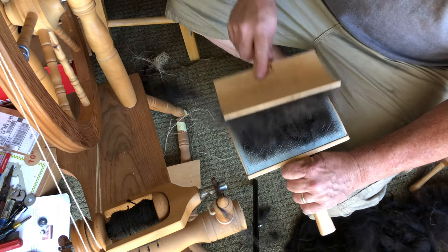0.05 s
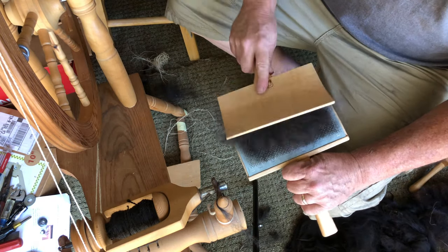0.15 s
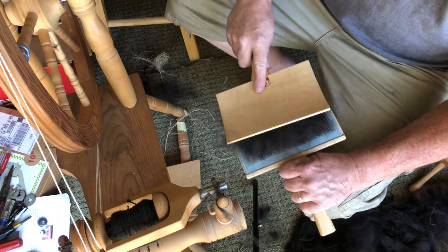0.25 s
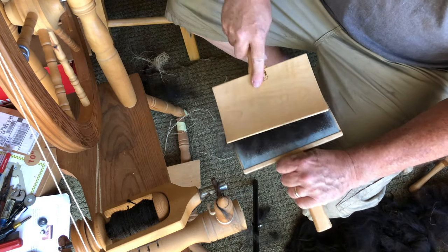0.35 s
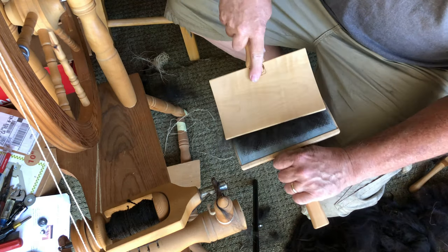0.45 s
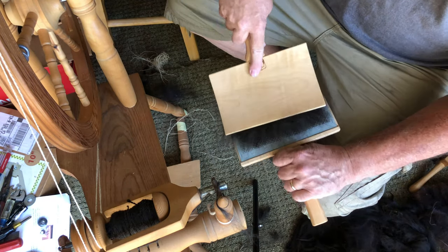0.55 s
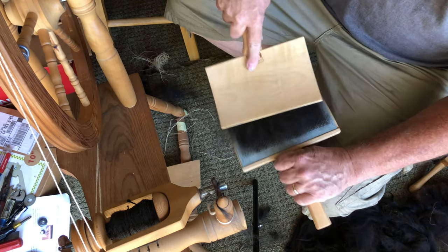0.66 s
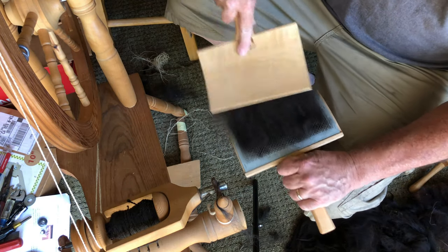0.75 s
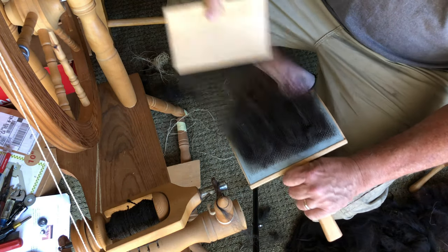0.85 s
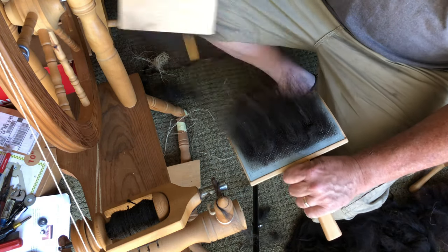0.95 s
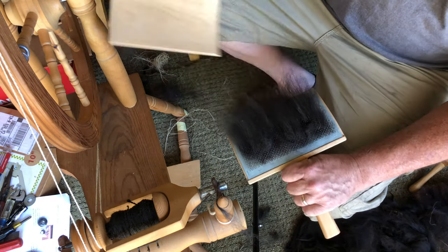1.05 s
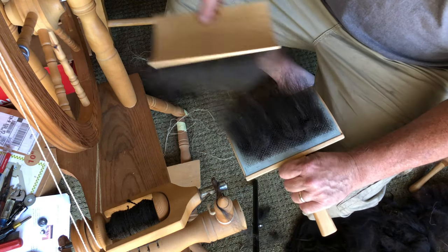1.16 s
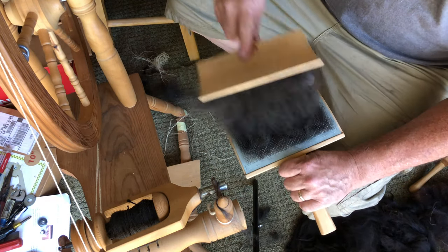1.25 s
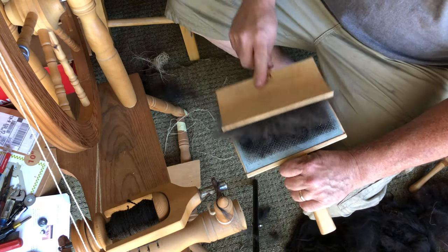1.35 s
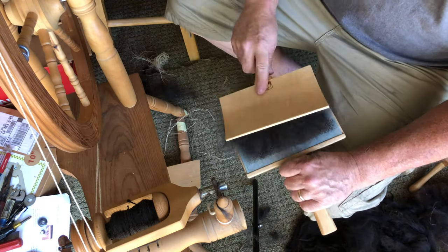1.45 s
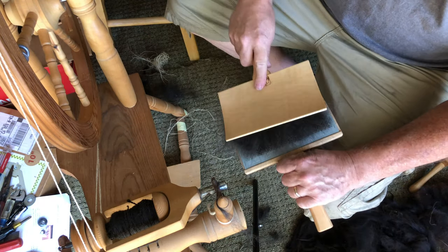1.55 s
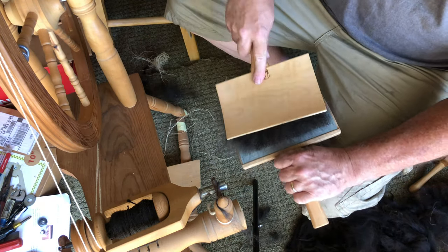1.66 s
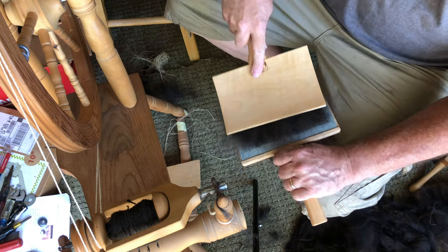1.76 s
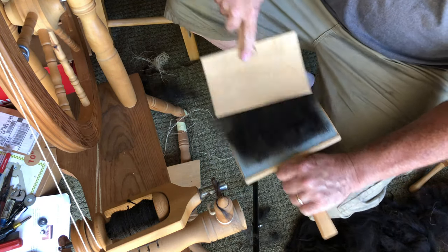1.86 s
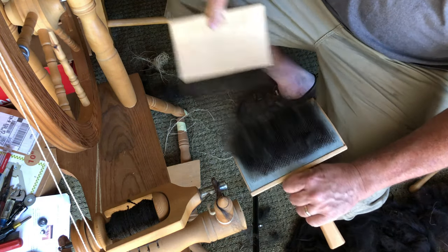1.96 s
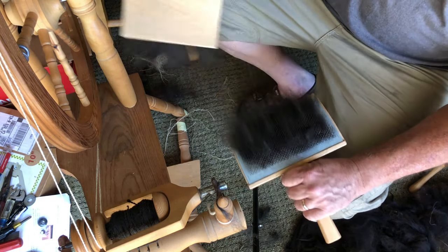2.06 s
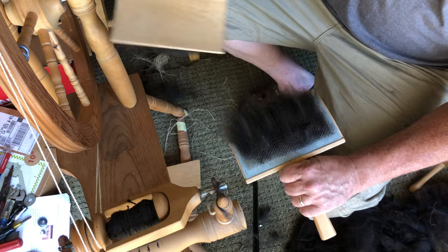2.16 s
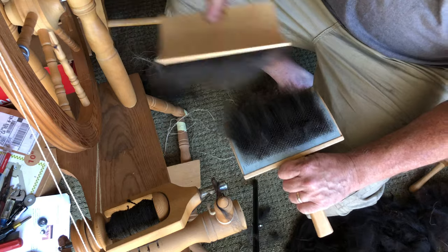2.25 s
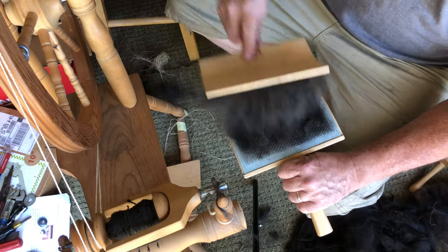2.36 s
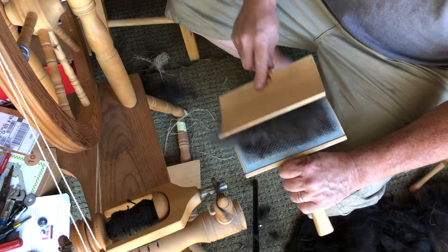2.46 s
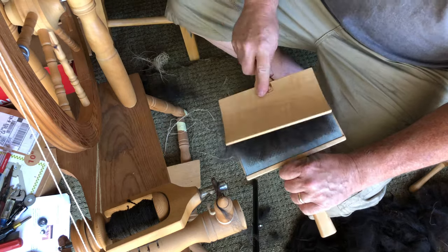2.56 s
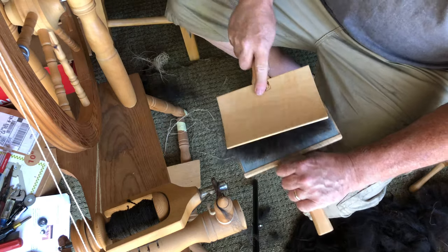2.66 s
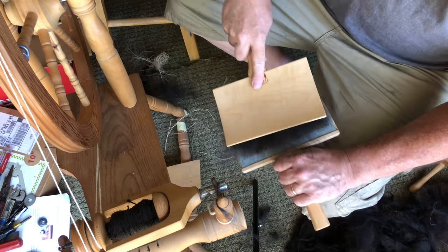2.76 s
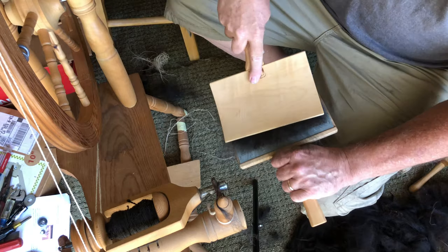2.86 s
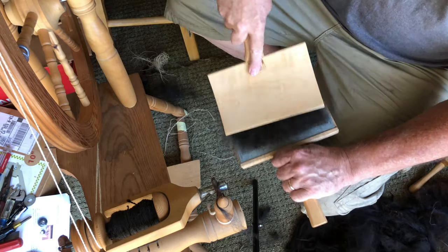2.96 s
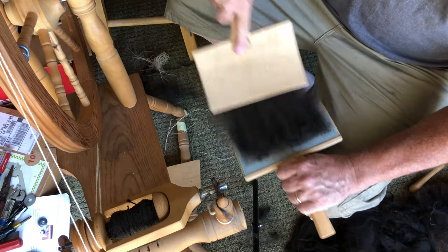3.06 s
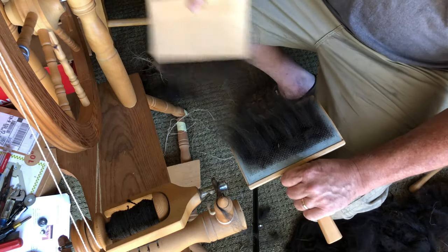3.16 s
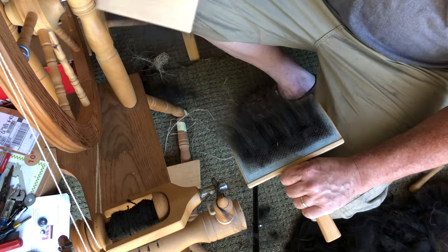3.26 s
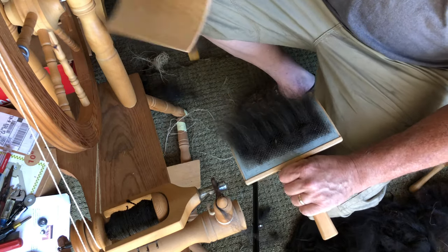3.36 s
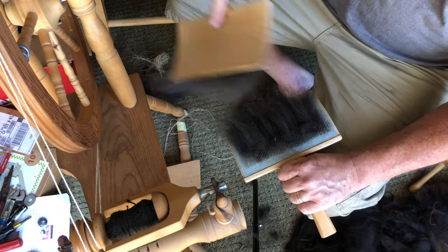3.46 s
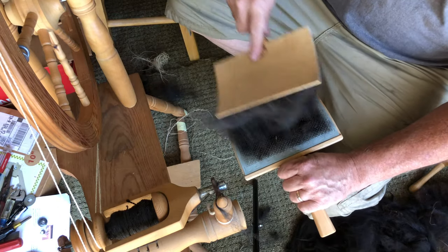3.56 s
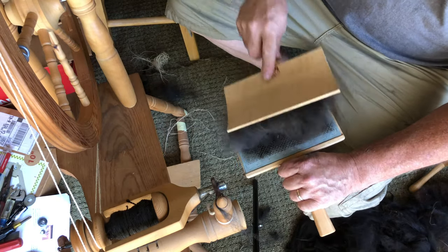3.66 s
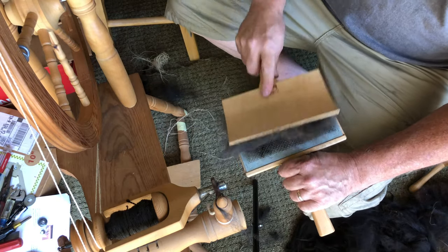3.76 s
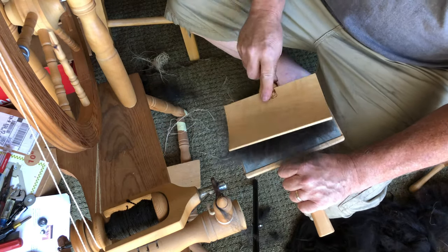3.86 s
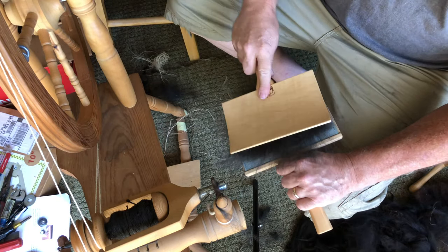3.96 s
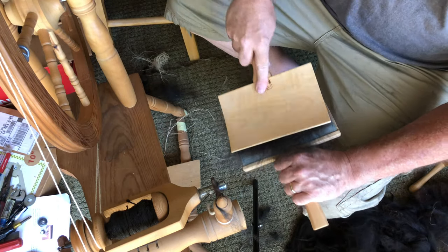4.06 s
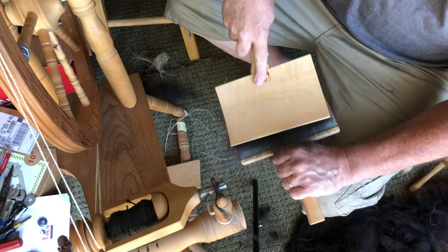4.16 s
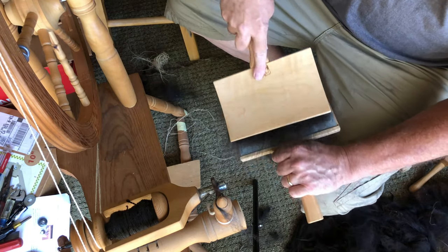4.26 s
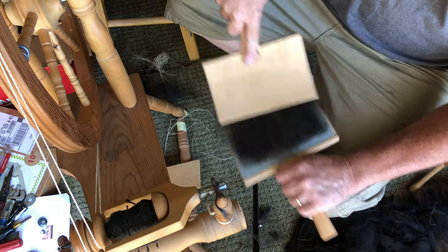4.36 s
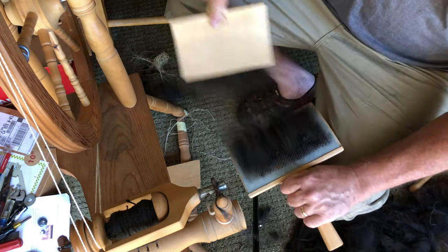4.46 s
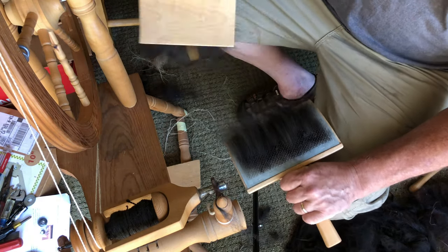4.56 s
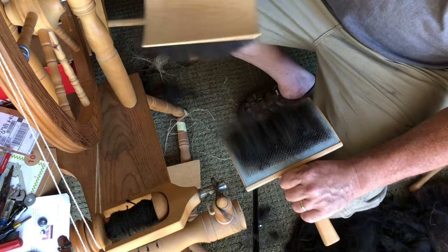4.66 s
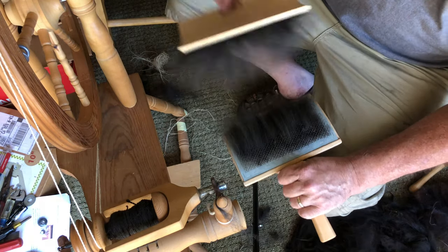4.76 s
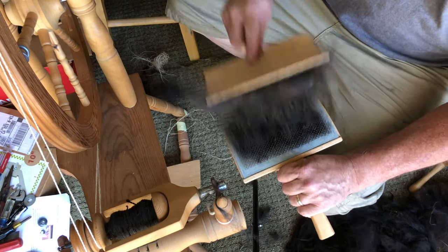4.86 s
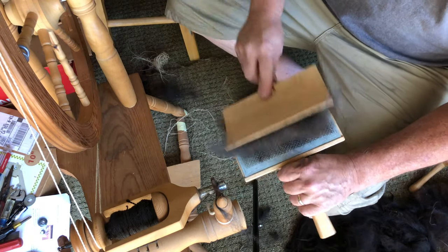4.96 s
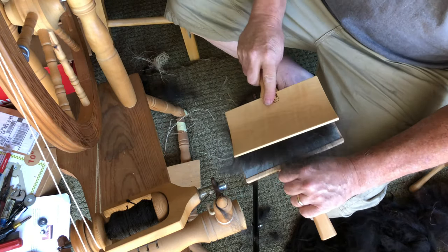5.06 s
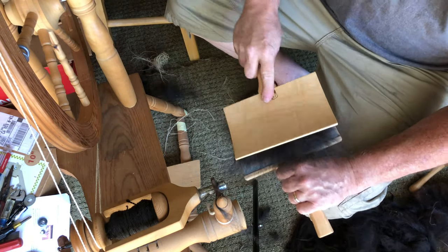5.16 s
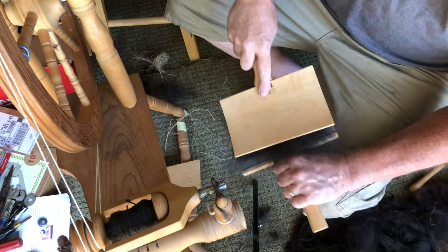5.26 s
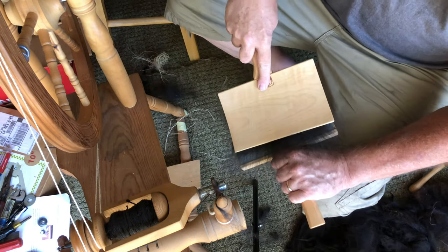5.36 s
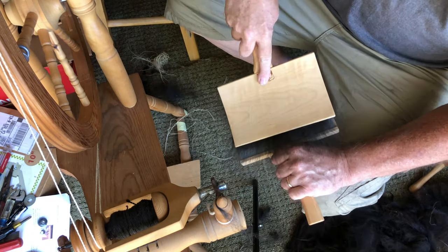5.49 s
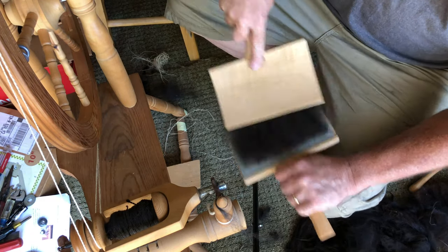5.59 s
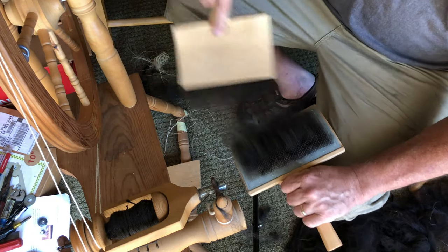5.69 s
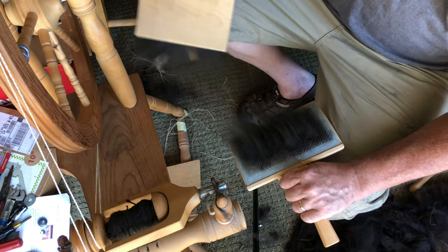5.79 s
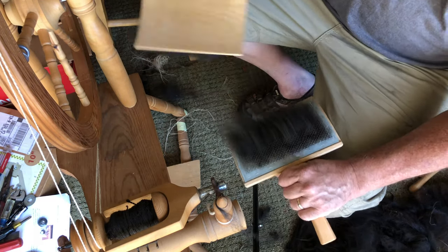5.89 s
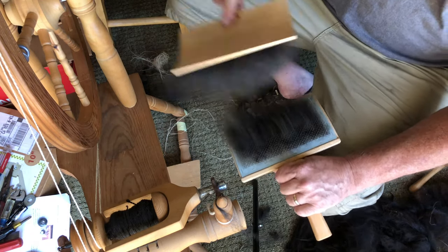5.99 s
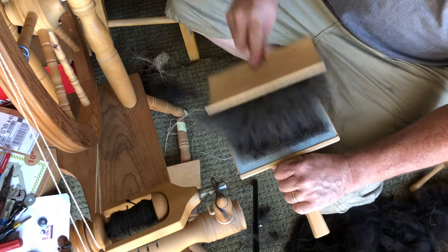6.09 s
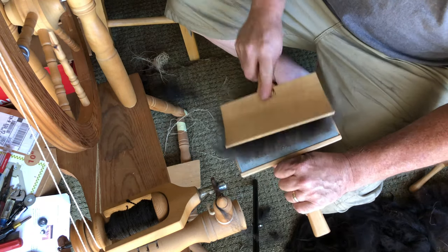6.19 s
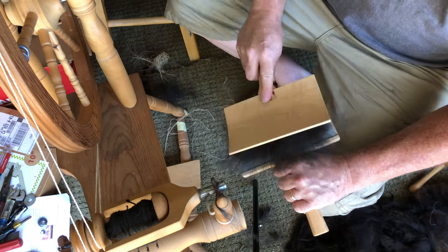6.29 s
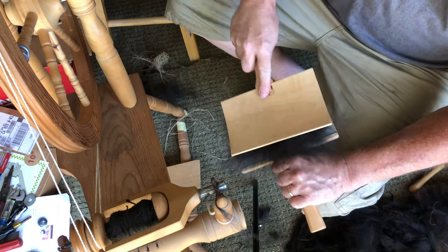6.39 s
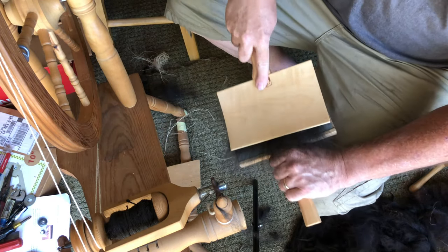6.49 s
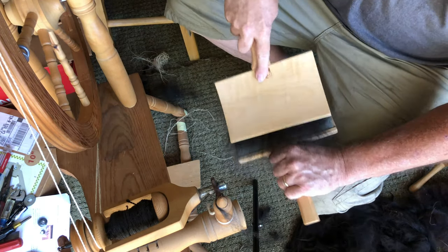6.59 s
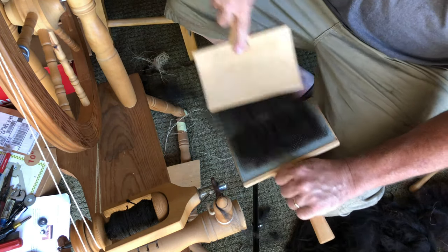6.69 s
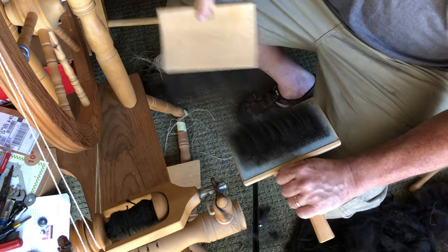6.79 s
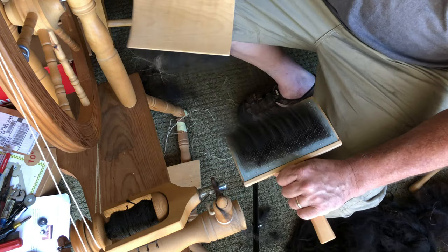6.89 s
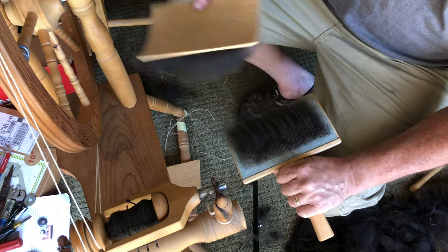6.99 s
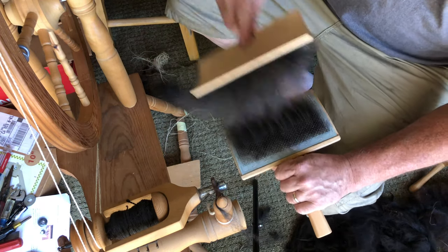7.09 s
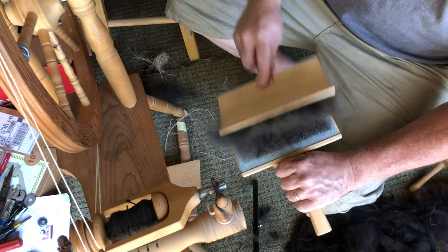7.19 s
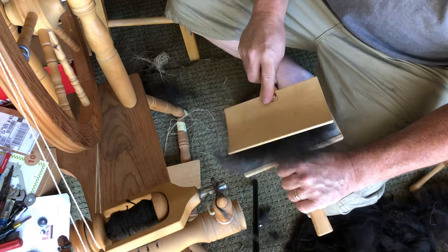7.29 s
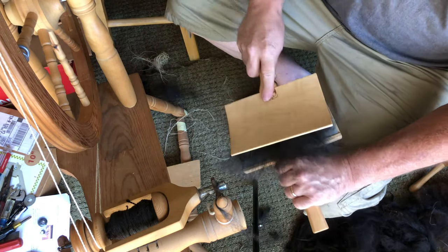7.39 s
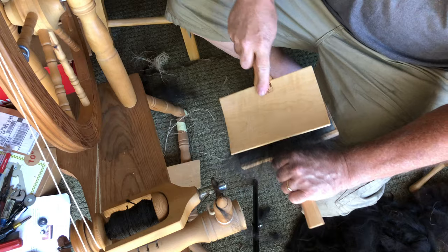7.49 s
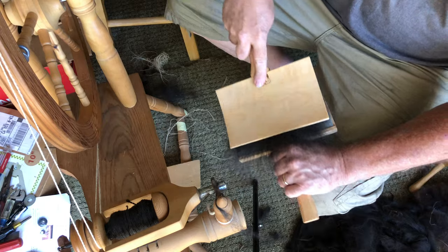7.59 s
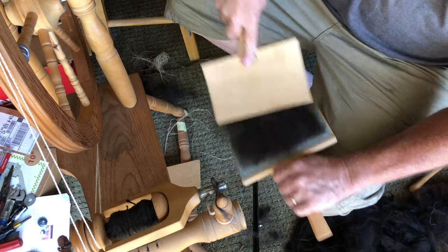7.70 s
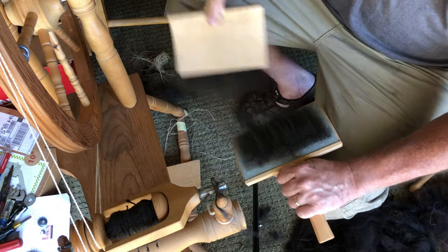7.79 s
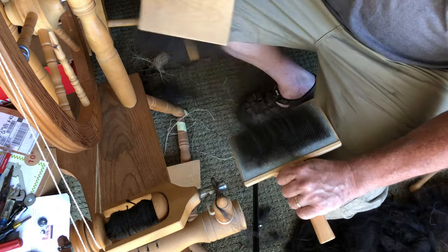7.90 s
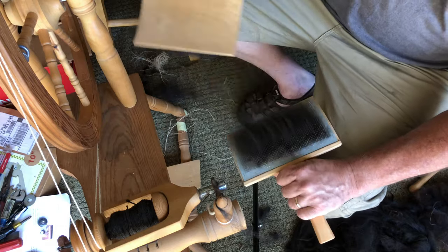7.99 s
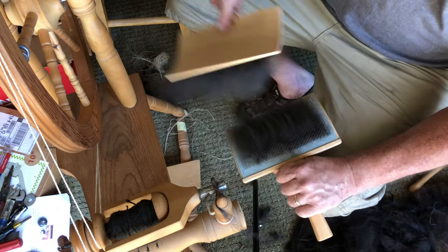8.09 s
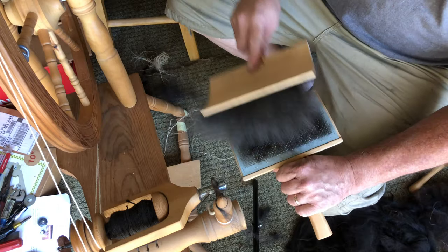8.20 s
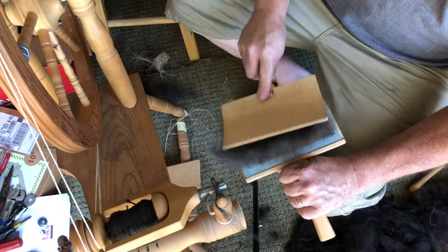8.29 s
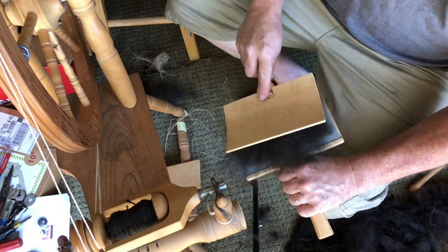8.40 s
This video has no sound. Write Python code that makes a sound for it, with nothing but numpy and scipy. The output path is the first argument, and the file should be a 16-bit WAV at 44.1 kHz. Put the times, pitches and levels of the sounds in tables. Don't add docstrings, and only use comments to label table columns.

```python
import sys
import numpy as np
from scipy import signal
from scipy.fft import rfft, irfft, next_fast_len
from scipy.io import wavfile
from scipy.ndimage import uniform_filter1d

SR = 44100
rng = np.random.default_rng(int(sys.argv[2]) if len(sys.argv) > 2 else 0)


def ratio_of_db(decibels):
    return 10 ** (np.asarray(decibels, float) / 20)


def inscribe(sig):
    pcm = np.round(np.clip(np.atleast_2d(sig).T, -1, 1) * 32767)
    wavfile.write(sys.argv[1], SR, pcm.astype(np.int16))


N = 372204
KNOCK_S = 3.3745

PART_ANSWERS = {"paddle": (0.16, 0, 0.5, 1.01, 153.5, 4), "shanks": (-13, 3.5, -8, 1.22, 90.5, 8),
                "flex": (-10.5, -4, -7.5, 1.22, 150.5, 4), "tips": (-14.5, 7.5, -6, 1.26, 69.5, 15)}


def evened(x):
    return x / np.sqrt(np.mean(x ** 2) + 1e-20)


def read(points, hz):
    f, value = np.transpose(points)
    return np.interp(np.log(hz + 1), np.log(f + 1), value)


def add(mix, s, sound):
    part = mix[round(s * SR):][:len(sound)]
    part += sound[:len(part)]


def coloured(x, spectrum):
    gain_db = np.maximum(read(spectrum, abs(np.fft.fftfreq(4096, 1 / SR))), -70)
    log_gain = np.log(ratio_of_db(gain_db))
    phase = -signal.hilbert(log_gain).imag
    taps = np.fft.ifft(np.exp(log_gain + 1j * phase)).real[:2048]
    return signal.oaconvolve(x, taps / np.linalg.norm(taps))[:len(x)]


def resonate(x, hz, width_hz):
    r = np.exp(-np.pi * width_hz / SR)
    return 2 * signal.lfilter([1 - r], [1, -r * np.exp(2j * np.pi * hz / SR)], x).real


def cards():
    # Hz, dB per Hz.
    paddle_colour = [(350, -37.5), (600, -7), (669, -11), (721, -5.5), (1050, 0.5), (1850, -4.5),
                     (2220, -4), (2410, -6), (3180, -7), (3690, -16), (4400, -13), (5720, -35.5),
                     (9680, -120)]
    # Hz, dB per Hz.
    shank_colour = [(2240, -34), (3800, -3.5), (5380, 5.5), (7070, -3.5), (8400, -18), (10900, -32),
                    (18500, -120)]
    # Hz, dB per Hz.
    tip_colour = [(4710, -34.5), (8000, -3.5), (9600, 1.5), (10600, -1), (15100, -11), (16000, -13.5)]
    shared = slips(4000, spread_db=2.0, clump_db=3.0, clump_s=0.0039)
    fine = slips(14000, spread_db=3.5, clump_db=1.0, clump_s=0.0017)
    pull = {part: ratio_of_db(-1.0) * effort(part) for part in PART_ANSWERS}
    brushing = rustle_gain() * fine

    paddle = pull["paddle"] * regripped(evened(shared + 0.89 * fine), patchy_db=2.5)
    shanks = pull["shanks"] * regripped(evened(0.64 * shared + fine), patchy_db=3.5)
    shanks += ratio_of_db(-10.0) * brushing
    tips = pull["tips"] * regripped(evened(0.79 * shared + fine), patchy_db=1.6)
    tips += ratio_of_db(-3.5) * brushing
    bending = pull["flex"] * evened(resonate(resonate(shared + fine, 430, 270), 293, 350))

    passing = abs(slips(70, spread_db=0.5, clump_db=1.5, clump_s=.05))
    ticks = signal.lfilter([1], [1, -.985], passing) * fine

    crunch_paddle, crunch_wires = crunches()
    snag_paddle, snag_wires, rings = snags()
    struck = ratio_of_db(-12.5) * pull["shanks"] * evened(ticks) + crunch_wires + snag_wires
    wood = coloured(paddle + crunch_paddle + snag_paddle, paddle_colour)
    wires = coloured(shanks + ratio_of_db(-2.0) * struck, shank_colour)
    wires += coloured(tips + ratio_of_db(-0.85) * struck, tip_colour)
    return wood + wires + rings + bending


def slips(per_s, spread_db, clump_db, clump_s):
    clicks = (rng.random(N) < per_s / SR) * rng.standard_normal(N)
    clumps = signal.lfilter([1], [1, -np.exp(-1 / (clump_s * SR))], rng.standard_normal(N))
    size_db = spread_db * np.minimum(rng.exponential(1, N), 2.6)
    return evened(clicks * ratio_of_db(size_db + clump_db * evened(clumps)))


def effort(part):
    # teeth engaged in seconds, card lifts in seconds,
    # last fibres part in seconds, drag at the start in dB, drag at the lift in dB.
    strokes = [
        (.225, .89, .906, -55.5, -60.5),
        (1.51, 1.93, 2.04, -57, -57),
        (2.58, 3.1, 3.16, -51, -57),
        (3.89, 4.44, 4.54, -59, -56),
        (5.09, 5.7, 5.77, -49, -63),
        (6.305, 6.7, 6.78, -50, -56),
        (7.36, 7.745, 7.81, -49, -53),
        (8.395, 8.5, 8.6, -50, -52),
    ]
    # peak in seconds,
    # peak in dB, build-up in seconds, let-go in seconds (both for 10 dB).
    tears = [(.5, -53, 0.035, .08), (.724, -49.5, 0.051, 0.069), (.865, -56, 0.059, .06),
             (1.55, -56, .03, 0.035), (1.86, -49.5, 0.13, 0.048), (2.595, -48, 0.0084, 0.019),
             (2.666, -48.5, 0.011, 0.012), (3.031, -47, 0.044, 0.03), (3.94, -55, 0.022, 0.032),
             (4.005, -53.5, 0.01, 0.3), (4.2, -54, 0.21, 0.031), (4.385, -47.5, .1, 0.041),
             (5.281, -47.5, 0.057, 0.022), (5.353, -49.5, 0.083, 0.061), (5.58, -50, 0.01, 0.056),
             (5.624, -48.5, 0.081, 0.056), (6.48, -53, 0.026, 0.1), (6.547, -50, 0.07, 0.022),
             (6.683, -47, 0.064, 0.047), (7.575, -50, 0.036, 0.12), (7.70, -49, 0.014, .03),
             (7.74, -43, 0.033, 0.0097)]
    drag_db, thin_db, tear_db, steep, fade_db_per_s, drop_db = PART_ANSWERS[part]
    usual_db = -52
    engage_s, parting_db_per_s = 0.014, 900
    t = np.arange(0, N + 64, 64) / SR
    power, cut_db = 1e-14, 0
    for start, lift, parted, first_db, last_db in strokes:
        done = np.clip((t - start) / (lift - start), 0, 1)
        hand_db = first_db + (last_db - first_db) * done
        db = steep * (hand_db - usual_db) + thin_db * done - fade_db_per_s * np.maximum(t - lift, 0)
        engaged = np.clip(1 + (t - start) / engage_s, 0, 1)
        power = power + (ratio_of_db(usual_db + drag_db + db) * engaged) ** 2
        parting_db = -np.clip(parting_db_per_s * (t - parted), 0, drop_db)
        cut_db = np.where(t > start - engage_s, parting_db, cut_db)
    for s, peak_db, build, let_go in tears:
        db = peak_db - 10 * np.maximum((s - t) / build, (t - s) / let_go)
        power = power + ratio_of_db(usual_db + steep * (db - usual_db) + tear_db) ** 2
    return np.interp(np.arange(N) / SR, t, np.sqrt(power) * ratio_of_db(cut_db))


def regripped(x, patchy_db):
    z = signal.stft(x, nperseg=256)[2]
    patches = uniform_filter1d(rng.standard_normal(z.shape), size=14, axis=1)
    patches = evened(uniform_filter1d(patches, size=4, axis=0))
    gain = ratio_of_db(patchy_db * patches - 0.1728 * patchy_db ** 2)
    return signal.istft(z * gain, nperseg=256)[1][:N]


def crunches():
    # start in seconds, length in seconds, paddle level in dB,
    # wire level in dB, swell over the length in dB.
    landings = [
        (0.196, 0.029, -39.5, -50, -14.5),
        (1.479, 0.014, -40, -42, -10),
        (2.56, 0.057, -71.5, -69, 0),
        (3.868, 0.0057, -30, -35.5, 0),
        (5.056, 0.027, -48, -53.5, 3.5),
        (6.285, 0.0089, -30, -39, -2),
        (7.338, 0.015, -37, -43, -0.5),
        (8.3694, 0.012, -37, -42, -3.5),
    ]
    paddle, wires = np.zeros(N), np.zeros(N)
    for s, length, paddle_db, wire_db, swell_db in landings:
        noise, grain = rng.standard_normal((2, 3000))
        u = np.arange(3000) / SR / length
        shape = ratio_of_db(swell_db * np.minimum(u, 1) - 46 * np.maximum(u - 1, 0))
        shape *= np.minimum(u * length / 0.0033, 1)
        crunch = shape * evened(noise * ratio_of_db(4.1 * evened(uniform_filter1d(grain, size=30))))
        knocked = resonate(resonate(crunch, 1500, 1700), 1500, 2020)
        add(paddle, s, ratio_of_db(paddle_db + 2.0) * knocked)
        add(wires, s, ratio_of_db(wire_db) * crunch)
    return paddle, wires


def snags():
    # start in seconds, paddle peak in dB,
    # wire level in dB, paddle ring in Hz, t60 in seconds.
    landing_catches = [(0.2047, -36, -35.5, 1340, 0.026), (0.2054, -28.5, -61.5, 1950, 0.016),
                       (0.2186, -33, -45, 1490, 0.008), (1.4782, -22.5, -45, 2060, 0.0046),
                       (1.4903, -24.5, -37, 1740, 0.0075), (2.5617, -30.5, -46.5, 1110, 0.016),
                       (2.5716, -33, -43, 1070, 0.013), (3.8683, -27, -36, 1220, 0.045),
                       (5.061, -26.5, -39.5, 1130, 0.028), (5.0768, -24.5, -42, 1180, 0.016),
                       (6.283, -23, -29, 1210, 0.0067), (7.344, -25, -42, 1460, 0.0074),
                       (7.3482, -27.5, -51, 1480, 0.0074), (8.3779, -19, -53, 1570, 0.013),
                       (8.3793, -26, -27.5, 1760, 0.01), (8.3834, -19, -34, 860, 0.01),
                       (8.4213, -36, -54, 1410, 0.012)]
    # start in seconds, paddle peak in dB,
    # wire level in dB, paddle ring in Hz.
    draw_snags = [(0.2716, -32.5, -53.5, 1000), (0.3044, -32.5, -52, 1660), (0.3771, -34, -49, 1840),
                  (0.3976, -37, -52, 1730), (0.4098, -33.5, -48, 1690), (0.559, -38, -48.5, 1380),
                  (0.832, -44, -50, 990), (1.5275, -41, -50, 1710), (1.5768, -32.5, -53, 1670),
                  (1.6687, -28.5, -46, 1730), (1.7358, -36, -49, 1750), (2.5932, -30.5, -50, 1390),
                  (2.6613, -35, -47, 1590), (2.7027, -34.5, -51, 1560), (2.7338, -34.5, -44.5, 1690),
                  (2.8266, -41, -51, 1690), (3.9313, -26.5, -38.5, 1540), (4.0005, -31.5, -39, 1010),
                  (4.055, -33, -46, 1540), (4.162, -35.5, -48, 1290), (5.1057, -29.5, -45, 1210),
                  (5.156, -33, -41.5, 1210), (5.2079, -35, -49, 1740), (5.2779, -28, -45, 1360),
                  (5.5647, -40, -48, 2260), (6.475, -29.5, -44, 1580), (6.6207, -35.5, -52, 2900),
                  (6.6738, -34, -41, 1950), (7.5155, -38, -64, 1430), (7.6915, -36, -42.5, 2300)]
    events = list(landing_catches) + [(*row, 0.014) for row in draw_snags]
    paddle, wires, rings = np.zeros(N), np.zeros(N), np.zeros(N)
    t = np.arange(900) / SR
    for s, peak_db, wire_db, hz, t60 in events:
        decay = ratio_of_db(-60 * t / np.clip(1.2 * t60, .002, .05))
        burst = rng.standard_normal(900) * decay * np.minimum(t / 0.00044, 1)
        burst /= np.sqrt(np.sum(burst ** 2) / (0.00086 * SR))
        add(wires, s, ratio_of_db(wire_db) * burst)
        add(paddle, s, ratio_of_db(peak_db - 7.5) * resonate(burst, 1850, 2500))
        ring = np.minimum(t * hz, 1) * np.sin(2 * np.pi * hz * t)
        add(rings, s, ratio_of_db(peak_db - 6.5 - 60 * t / (0.004 + t60)) * ring)
    return paddle, wires, rings


def rustle_gain():
    # time in seconds, level in dB.
    swing = [
        (4.72, -93),
        (4.734, -101),
        (4.774, -73),
        (4.812, -71),
        (4.914, -78),
        (4.974, -92.5),
        (4.98, -85),
    ]
    s, db = np.transpose(swing)
    t = np.arange(N) / SR
    fade = np.clip((t - s[0]) / .01, 0, 1) * np.clip((s[-1] + .04 - t) / .04, 0, 1)
    return ratio_of_db(np.interp(t, s, db)) * fade


def thuds():
    # start in seconds, peak in dB, pitch in Hz, t60 in seconds.
    gives = [
        (0.205, -43.5, 169, 0.053),
        (1.485, -43.5, 202, 0.023),
        (2.574, -55, 212, 0.057),
        (5.07, -36, 206, 0.036),
        (5.279, -63, 107.8, 0.079),
        (6.297, -35, 192, 0.028),
        (7.345, -42, 218, 0.036),
        (8.38, -34.5, 283, 0.026),
        (8.394, -42.5, 112, 0.042),
    ]
    out, t = np.zeros(N), np.arange(5000) / SR
    for s, peak_db, hz, t60 in gives:
        turns = hz * (t + 0.16 * 0.0043 * (1 - np.exp(-t / 0.0018)))
        swell = 1 - np.exp(-t / 0.0015)
        add(out, s, ratio_of_db(peak_db + 9.5 - 60 * t / t60) * swell * np.sin(2 * np.pi * turns))
    return out


def flicks():
    # start in seconds, peak in dB, ring in Hz.
    tip_flicks = [(0.7193, -41, 5650), (2.6464, -39, 10900), (2.8504, -35, 5480), (2.979, -38, 5260),
                  (3.9944, -35, 5530), (4.2971, -39, 5250), (4.3274, -35, 10800), (5.1816, -45, 9930),
                  (5.2155, -37, 10400), (5.2394, -42, 5970), (5.2629, -36, 5140), (5.4839, -52, 10700),
                  (5.5074, -43, 8350), (5.5284, -42, 9730), (6.3824, -36, 5400), (6.4632, -36.5, 10300),
                  (6.4931, -35, 5690), (6.5949, -39, 6440), (7.4225, -43, 9540), (7.4794, -40, 8330),
                  (7.6313, -35, 8740), (7.6644, -34, 5520), (7.7105, -35, 5050)]
    t60_s, width_hz = 0.01, 6000
    out, t = np.zeros(N), np.arange(600) / SR
    for s, peak_db, hz in tip_flicks:
        noise = rng.standard_normal(len(t))
        scratch = evened(resonate(resonate(noise, hz, width_hz), hz, width_hz))
        add(out, s, ratio_of_db(peak_db - 6 - 60 * t / t60_s) * np.minimum(t / 0.00062, 1) * scratch)
    return out


def knock():
    # pitch in Hz, level in dB, t60 in seconds.
    modes = [(177, -9, 0.054), (302, -4.5, 0.033), (480, -4.5, 0.0086), (665, -1, 0.037), (799, -1, 0.023),
             (1050, 0, 0.034), (1340, 0, .025), (3370, -11.5, .015)]
    # delay in seconds, level in dB.
    touches = [
        (0, -0.5),
        (.0012, 3.5),
        (.003, -1.5),
        (.009, -4),
        (0.013, -5),
        (0.0194, -5.5),
    ]
    # Hz, dB per Hz.
    crack_colour = [(60, -30), (110, -47), (200, -18.5), (400, -14), (700, -1.5), (1300, 1.5), (2100, 4.5),
                    (3200, -3.5), (4500, -9.5), (7000, -5.5), (11000, -14.5), (16000, -24)]
    ring_db, crack_db = -28.5, -17.5
    t, cracks, rings = np.arange(6000) / SR, np.zeros(N), np.zeros(N)
    ring = sum(ratio_of_db(db - 60 * t / t60) * np.sin(2 * np.pi * hz * t) for hz, db, t60 in modes)
    for delay, db in touches:
        crack = ratio_of_db(crack_db + db - 650 * delay - 60 * t / 0.007) * np.sign(rng.standard_normal(len(t)))
        add(cracks, KNOCK_S + delay, crack)
        add(rings, KNOCK_S + delay, ratio_of_db(ring_db + db) * ring)
    low_cut = signal.butter(4, 145, "high", fs=SR, output="sos")
    return signal.sosfilt(low_cut, rings + coloured(cracks, crack_colour))


def knock_into_room():
    # Hz, dB per Hz.
    echo_colour = [(90, -26.5), (200, -6), (700, -7), (1300, -2.5), (2200, -12.5), (5000, -14),
                   (12000, -26)]
    blow = np.zeros(N)
    add(blow, KNOCK_S, np.ones(1))
    return ratio_of_db(-5.5) * coloured(blow, echo_colour)


def room(x):
    # Hz, t60 in seconds.
    decay = [(150, 0.45), (400, 0.44), (1040, 0.5), (2760, 0.49), (7280, 0.25)]
    taps, at = np.zeros(SR // 2), np.arange(200, SR // 2 - 20, 20)
    taps[at + rng.integers(0, 20, len(at))] = rng.choice([-1., 1.], len(at))
    hz, t, z = signal.stft(taps, SR, nperseg=256)
    tail = signal.istft(z * ratio_of_db(-60 * t / read(decay, hz)[:, None]), SR, nperseg=256)[1]
    return signal.fftconvolve(x, tail / np.linalg.norm(tail))[:N]


def background():
    # Hz, dB per Hz.
    air_colour = [(15, -123), (25, -104), (60, -93.5), (87, -90), (108, -86), (124, -92), (142, -89),
                  (196, -90), (251, -93), (320, -94), (630, -101.5), (1000, -106), (2000, -109.5),
                  (4200, -113), (5500, -117), (13000, -125), (16300, -130)]
    # centre in Hz, width in Hz, level in dB.
    fan_tones = [(117.3, 3.8, -74), (151.9, 11, -72), (59, 7.7, -87), (199, 16, -77)]
    motor_hz, motor_db = 98, -66
    size = next_fast_len(N)
    gain = ratio_of_db(read(air_colour, np.fft.rfftfreq(size, 1 / SR)))
    air = np.sqrt(SR / 2) * irfft(rfft(rng.standard_normal(size)) * gain, size)[:N]
    hum = np.zeros(N)
    for hz, width_hz, db in fan_tones:
        tone = resonate(resonate(rng.standard_normal(N), hz, width_hz), hz, width_hz)
        hum += ratio_of_db(db) * evened(tone)
    drift, waver = (evened(uniform_filter1d(uniform_filter1d(v, 5000), 5000))
                    for v in rng.standard_normal((2, N)))
    turns = np.cumsum(motor_hz + 1.3 * drift) / SR
    motor = ratio_of_db(motor_db + 1.9 * waver) * np.sin(2 * np.pi * turns)
    return air + hum + motor


def scene():
    combing = cards() + thuds() + flicks()
    echo = room(ratio_of_db(-13.5) * combing + knock_into_room())
    return (combing + knock() + echo + background())[None]


def top_cut(x):
    return signal.sosfilt(signal.butter(12, 16600, fs=SR, output="sos"), x)


def record(dry):
    edge_hz = 15820
    taps = signal.firwin(801, edge_hz, window=("kaiser", 8), fs=SR)
    low = signal.oaconvolve(dry, taps[None], "same")
    return top_cut(low + ratio_of_db(-31.0) * (dry - low))


dry = scene()
out = record(dry)
inscribe(out)
```